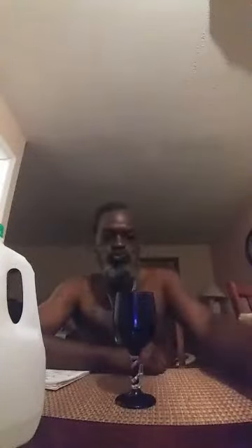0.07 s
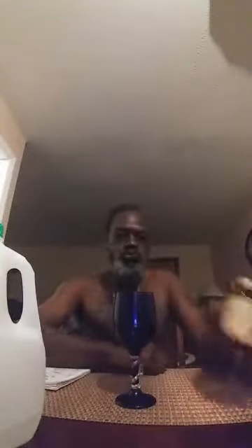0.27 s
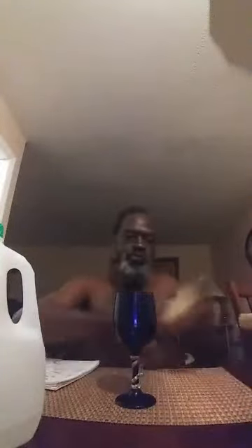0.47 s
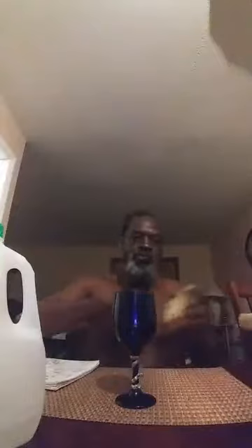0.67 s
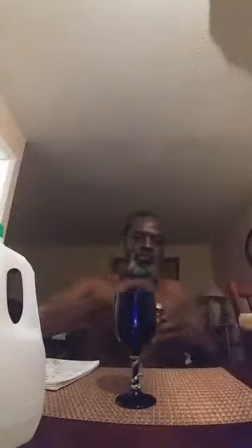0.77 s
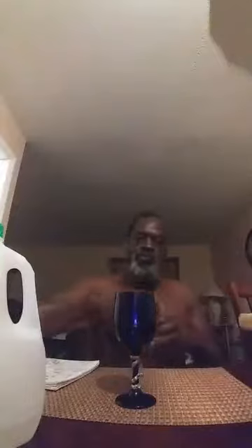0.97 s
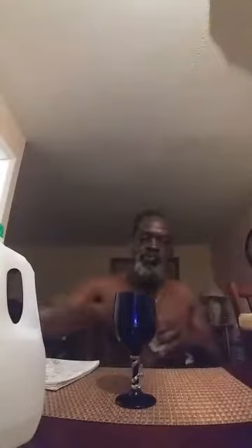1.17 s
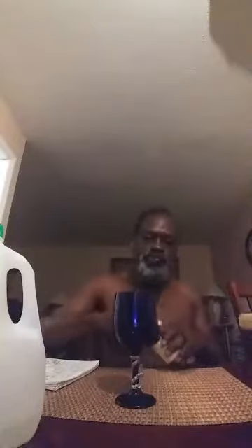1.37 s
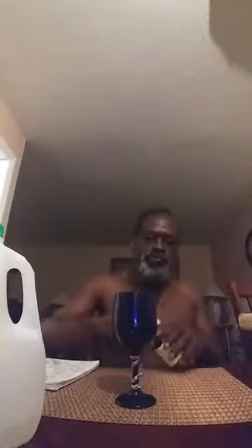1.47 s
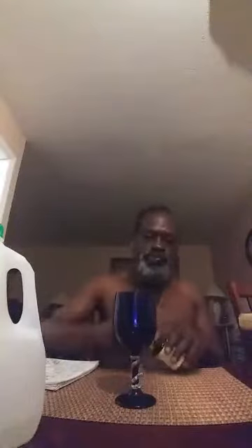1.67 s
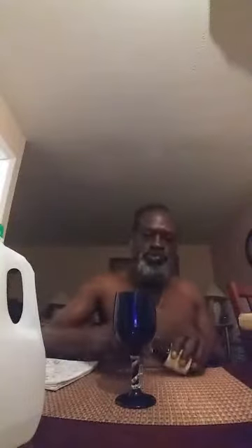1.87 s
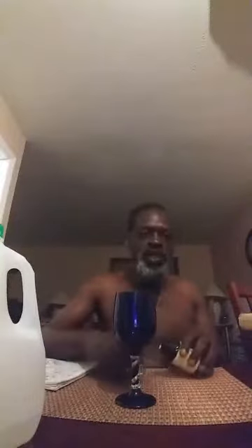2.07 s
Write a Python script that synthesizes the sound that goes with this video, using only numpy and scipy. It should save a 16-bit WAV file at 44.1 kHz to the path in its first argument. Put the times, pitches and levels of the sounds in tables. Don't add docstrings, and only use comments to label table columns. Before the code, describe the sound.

A small hard bottle of tablets is handled close to the microphone. A soft finger touch comes near 0.1 s, then bright rattling bursts at 0.45-0.6 and 0.67-0.8 s. The cap clicks at 1.0-1.1 s and rubs until 1.4 s, strongest near 1.3. A sharp rattle at 1.5-1.65 s precedes a table knock at 1.75 s. Faint brushing, short room echo, low hiss and hum.

```python
import sys
import numpy as np
from scipy import signal
from scipy.io import wavfile

SR = 44100
rng = np.random.default_rng(int(sys.argv[2]) if len(sys.argv) > 2 else 0)


def digitize_waveform(pressure):
    field = np.atleast_2d(pressure).T
    bounded = np.clip(field, -1, 1)
    quanta = np.round(bounded * 32767).astype(np.int16)
    wavfile.write(sys.argv[1], SR, quanta)


def to_linear_factor(level_db):
    exponent = np.asarray(level_db, float) / 20
    return 10 ** exponent


N = 92918

# frequency in Hz, width in Hz, level in dB.
LIFT_MODES = [(1760, 780, -12), (1957, 170, -12), (3580, 620, -8.5), (6560, 81, -6.5), (7070, 130, -9.5),
              (7620, 140, -6), (9100, 490, -5.5), (10000, 440, -6), (11580, 150, -0.5)]
# frequency in Hz, width in Hz, level in dB.
TIP_MODES = [(1850, 134, -8.5), (2000, 92, -9), (3610, 270, -15), (6400, 140, -28), (7900, 150, -6),
             (9100, 560, -2), (10000, 320, -12), (12000, 180, 0), (13300, 270, -16)]


def evened(x):
    return x / np.sqrt(np.mean(x ** 2) + 1e-20)


def read(points, hz):
    f, value = np.transpose(points)
    return np.interp(np.log(hz + 1), np.log(f + 1), value)


def curve(points, column=1):
    p = np.array(points)
    return to_linear_factor(np.interp(np.arange(N) / SR, p[:, 0], p[:, column], -140, -140))


def colour(x, points):
    gain = np.log(to_linear_factor(read(points, abs(np.fft.fftfreq(4096, 1 / SR)))))
    taps = np.fft.ifft(np.exp(np.conj(signal.hilbert(gain)))).real[:2048]
    return signal.oaconvolve(x, taps / np.linalg.norm(taps))[:N]


def resonate(x, hz, width):
    r = np.exp(-np.pi * max(width, 5) / SR)
    w = 2 * np.pi * hz / SR
    zeros = np.sqrt((1 - r * r) / 2) * np.array([1, 0, -1])
    return signal.lfilter(zeros, [1, -2 * r * np.cos(w), r * r], x)


def grit(per_s, spread_db):
    size = to_linear_factor(spread_db * np.minimum(rng.exponential(1, N), 4)) * rng.choice([-1., 1.], N)
    return evened(size * (rng.random(N) < per_s / SR))


def air():
    # frequency in Hz, level in dB per Hz.
    hiss = [(15, -60), (25, -18.5), (199, -3), (661, -12.5), (910, -24.5), (1160, -19), (1360, -27),
            (13400, -32), (14500, -67)]
    # frequency in Hz, width in Hz, level in dB.
    partials = [(66, 22, -53), (121, 12, -52), (223, 9, -49.5), (450, 18, -56)]
    hum = sum(to_linear_factor(db) * resonate(rng.standard_normal(N), hz, w) / np.sqrt(2) for hz, w, db in partials)
    return to_linear_factor(-51) * colour(rng.standard_normal(N), hiss) + hum


def room(x):
    # frequency in Hz, T60 in seconds.
    decay = [(250, 0.62), (660, 0.28), (1740, 0.22), (4590, 0.19), (12100, 0.15)]
    gap_s, late_db, late_slower = 0.0037, -24.5, 6.1
    taps = np.zeros(SR)
    at = np.arange(round(gap_s * SR), len(taps) - 10, 10)
    taps[at + rng.integers(0, 10, len(at))] = rng.choice([-1., 1.], len(at))
    hz, t, z = signal.stft(taps, SR, nperseg=128)
    fall_db = -60 * t / read(decay, hz)[:, None]
    fall = to_linear_factor(fall_db) + to_linear_factor(late_db + fall_db / late_slower)
    tail = signal.istft(z * fall, SR, nperseg=128)[1]
    return signal.oaconvolve(x, tail / np.linalg.norm(tail))[:N]


def rustle():
    # time in seconds, level in dB.
    strokes = [(0, -64), (.06, -50), (.11, -66), (.16, -62.5), (.3, -57), (.44, -64)]
    # frequency in Hz, level in dB.
    dry_colour = [(1200, -35), (2500, -28), (6500, -2), (9700, 8), (14000, -16)]
    hz, width_hz, start_db, t60_s = 600, 700, -49, 0.8
    shuffle = resonate(rng.standard_normal(N), hz, width_hz)
    shuffle = evened(resonate(shuffle, hz, 2 * width_hz))
    fade = to_linear_factor(start_db - 60 * np.arange(N) / SR / t60_s)
    return colour(grit(7000, 1.1), dry_colour) * curve(strokes) * to_linear_factor(-5) + shuffle * fade


def wooden_table(push, modes, rise_s):
    t = np.arange(SR // 4) / SR
    ring = sum(to_linear_factor(db - 60 * t / t60) * np.sin(2 * np.pi * hz * t) for hz, db, t60 in modes)
    return signal.oaconvolve(push, ring * np.minimum(t / rise_s, 1))[:N]


def wall(drive, hollow, modes, crack_db):
    # frequency in Hz, level in dB per Hz.
    crack = [(300, -9), (900, -10), (2600, -12), (5000, -12), (6500, -9), (10000, -6.5), (14000, -7.5)]
    # frequency in Hz, level in dB per Hz.
    body = [(250, -27.5), (600, 6), (1500, 4), (2400, -12), (3200, -3.5), (5000, -19.5), (14000, -40)]
    hollow_below_hz, damped_hz = 4500, 130
    out = to_linear_factor(crack_db) * colour(drive, crack)[:len(drive)]
    out = out + to_linear_factor(-18) * colour(hollow, body)[:len(drive)]
    for hz, w, db in modes:
        if hz < hollow_below_hz:
            push, size = resonate(hollow, hz, 4 * w), np.std(hollow)
        else:
            push, size = drive, np.std(drive)
        out = out + to_linear_factor(db) * size * evened(resonate(push, hz, max(w, damped_hz)))
    return out


def ticks(events, modes, db, crack_db, skew):
    # frequency in Hz, level in dB, T60 in seconds.
    wood = [(232, -7, .05), (310, -3, .05), (420, -4, .05), (600, -4, .04), (850, -4, .035)]
    spot_detune, spot_db = 0.006, 2.5
    out, thud = np.zeros((2, N + 3000))
    t = np.arange(3000) / SR
    for s, peak_db, hollow_db, thud_db, ms in events:
        u = np.clip(t / (max(ms, 1) / 1000), 0, 1)
        burst = np.sin(np.pi * u ** skew) * rng.standard_normal(len(t))
        burst = to_linear_factor(peak_db + db) * burst / np.linalg.norm(burst)
        chance = rng.standard_normal((len(modes), 2))
        spot = [(hz * (1 + spot_detune * a), w, level + spot_db * b)
                for (hz, w, level), (a, b) in zip(modes, chance)]
        at = round(s * SR)
        out[at:at + len(t)] += wall(burst, to_linear_factor(hollow_db) * burst, spot, crack_db)
        thud[at] += to_linear_factor(peak_db + thud_db)
    return out[:N] + wooden_table(thud[:N], wood, 0.0018)


def finger_touches():
    # start in seconds, peak in dB, hollow push in dB, thud in dB, contact in ms.
    touches = [
        (.0628, -24.5, 1.5, -45, 6.7),
        (.0894, -50, -3, -35, 4.4),
        (2.0974, -43.5, 11, -33, 23),
    ]
    # frequency in Hz, width in Hz, level in dB.
    modes = [(3980, 2000, 2), (5330, 4400, -6), (9700, 2600, 9)]
    return ticks(touches, modes, db=1.0, crack_db=1.5, skew=0.18)


def chatter():
    # time in seconds, level in dB.
    lifting = [(.449, -44), (.47, -37.5), (.52, -50.5), (.575, -37.5), (.655, -124), (.665, -36),
               (.69, -37.5), (.75, -51), (.8, -45.5)]
    # time in seconds, level in dB.
    tipping = [(1.503, -69), (1.512, -37), (1.545, -45), (1.56, -50), (1.59, -41), (1.62, -87), (1.66, -66)]
    scuffs = signal.oaconvolve(grit(900, 2.2), np.hanning(90))[:N]
    g = evened(scuffs * rng.standard_normal(N))
    a, b = g * curve(lifting), g * curve(tipping)
    lifted = wall(a, a * to_linear_factor(-9.0), LIFT_MODES, crack_db=6.5)
    return lifted + wall(b, b * to_linear_factor(7.0), TIP_MODES, crack_db=7.0)


def cap_rub():
    # time in seconds, level in dB, hollow push in dB.
    stroke = [
        (1.12, -44, -32),
        (1.17, -54, 24.5),
        (1.2, -42.5, 11.5),
        (1.26, -39.5, 13),
        (1.275, -34, 8.5),
        (1.303, -26, 4.5),
        (1.33, -41.5, 14.5),
        (1.37, -48, 0),
        (1.41, -81, -21),
    ]
    # frequency in Hz, width in Hz, level in dB.
    modes = [(1230, 260, -16), (1626, 286, -7.5), (2030, 370, -13.5), (4500, 1300, -5), (8320, 390, -5),
             (9070, 250, -4), (12050, 250, -14)]
    g = grit(5000, 2.2) * curve(stroke) * to_linear_factor(-10.5)
    return wall(g, g * curve(stroke, column=2), modes, crack_db=5.5)


def cap_clicks():
    # start in seconds, peak in dB, hollow push in dB, thud in dB, contact in ms.
    clicks = [
        (1.0095, -19.5, -3.5, -34, 10.6),
        (1.0945, -16.5, 3.5, -30, 6.7),
        (1.1114, -25, -27, -16.5, 9.9),
    ]
    # frequency in Hz, width in Hz, level in dB.
    modes = [(1250, 450, -13), (2100, 400, -13), (3640, 280, -9), (4550, 1300, -10.5), (6400, 500, -11.5),
             (7700, 240, -5.5), (8320, 460, 2.5), (9160, 500, -5), (12100, 270, -2.5), (12700, 470, -11)]
    return ticks(clicks, modes, db=4.5, crack_db=0.0, skew=0.61)


def set_down():
    # start in seconds, peak in dB, hollow push in dB, thud in dB, contact in ms.
    landings = [
        (1.7492, -23.5, 17, -9, 5.8),
        (1.7862, -12, 2, -51, 1.4),
        (1.7872, -16.5, 13, -23, 3),
        (1.7956, -26, 19, -38, 4.6),
    ]
    # frequency in Hz, width in Hz, level in dB.
    modes = [(1940, 200, -18), (6800, 700, -9), (8500, 700, -8), (10000, 400, -4), (11200, 600, -9),
             (12900, 500, -7)]
    return ticks(landings, modes, db=2.5, crack_db=2.5, skew=0.94)


def base_knock():
    # frequency in Hz, level in dB, T60 in seconds.
    modes = [(452, -23, .09), (340, -31, .07), (641, -31, .07), (1150, -38, .03)]
    landing = 1. * (np.arange(N) == round(1.7465 * SR))
    return wooden_table(landing, modes, 0.0038)


def lift_tumble():
    # start in seconds, peak in dB, hollow push in dB, thud in dB, contact in ms.
    tumble = [(.4476, -18, 7.5, -20.5, 4.8), (.455, -25.5, 19, -40, 4.5), (.4605, -18.5, 5, -18, 8.1),
              (.465, -17.5, 9.5, -20, 3.1), (.4752, -27, 12, -10, 3.8), (.4933, -25.5, 13, -8, 7),
              (.5305, -21, 8.5, -10.5, 17), (.5532, -21.5, -3, -21, 6.4), (.5562, -15, -23, -39, 5.2),
              (.5617, -15, 2.5, -28, 5.8), (.5755, -22, -5, -34, 1.4), (.585, -32, -14, -24, 6.4),
              (.661, -51, -11, -28, 9.2), (.667, -17, 9, -18.5, 3.9), (.674, -23.5, 10, -19, 2.6),
              (.6769, -21, -8, -27, 2.5), (.6848, -11.5, 6, -30.5, 4.5), (.6921, -18.5, -14, -10.5, 4),
              (.699, -15, 5.5, -43, 12), (.7068, -34, -11, -38, 4.6), (.7185, -29, 12, -37, 8.3),
              (.761, -26, 6, -30, 3.1), (.7683, -13, -12, -43, 5.2), (.7753, -32, 2, -35, 4.5),
              (.7853, -18, -6, -40, 6.5), (.791, -21, 2, -30, 5.4)]
    return ticks(tumble, LIFT_MODES, db=6.5, crack_db=1.0, skew=0.38)


def tip_tumble():
    # start in seconds, peak in dB, hollow push in dB, thud in dB, contact in ms.
    tumble = [(1.5022, -9, -12, -39, 5), (1.507, -22, -12, -36, 6.8), (1.5125, -20, 0, -18, 3.4),
              (1.516, -13, -3, -21.5, 7.3), (1.523, -16.5, -3, -23, 4.8), (1.532, -9.5, 5, -24, 6),
              (1.539, -15, 0, -30, 5.4), (1.547, -28.5, -5, -27, 8), (1.5685, -20, -15, -16, 4.5),
              (1.5725, -19.5, 6, -17, 5.6), (1.5775, -18.5, 7, -25, 3.4), (1.586, -22, 5, -18, 3.3),
              (1.592, -33, 8, -6, 4.8), (1.628, -23.5, 8.5, -34, 12), (1.6318, -8.5, -3, -37, 7.8),
              (1.643, -26, 7, -11.5, 6.9)]
    return ticks(tumble, TIP_MODES, db=5.5, crack_db=2.0, skew=0.42)


def pings():
    # start in seconds, peak in dB, frequency in Hz, ring in ms.
    landings = [(.026, -40, 10000, 4.2), (.027, -49, 7700, 4), (.063, -35, 3830, 1.5), (.366, -51, 7800, 4),
                (1.094, -26.5, 2040, 3.8), (.455, -28, 2000, 2.2), (1.2985, -25.5, 8570, 6),
                (.4482, -21.5, 9100, 3), (.463, -18.5, 11900, 4), (.5565, -20, 12100, 5.6),
                (.5625, -20.5, 11750, 5.1), (.562, -26, 3570, 2.4), (.5755, -22.5, 8000, 2.5),
                (.5755, -23, 9900, 3.4), (.578, -22.5, 11800, 15), (.6775, -13.5, 11940, 7.2),
                (.683, -17.5, 6400, 7.1), (.6855, -15, 11920, 3.7), (.7068, -30, 10000, 5.9),
                (.718, -23, 10240, 5.9), (.769, -29, 6400, 12), (.775, -16.5, 11870, 3.8),
                (1.304, -35, 3620, 14), (1.356, -44.5, 3560, 12), (1.5025, -10.5, 11860, 4.7),
                (1.503, -26, 3610, 5.1), (1.518, -27.5, 3610, 12.5), (1.528, -22, 1850, 3.6),
                (1.533, -17.5, 12000, 9), (1.533, -30, 1970, 6), (1.542, -28, 1853, 4),
                (1.578, -32, 1958, 13), (1.634, -15.5, 9100, 4.2), (1.636, -21, 12000, 4.6),
                (1.7495, -25, 8500, 1.7), (1.012, -30, 12100, 5.5), (1.3, -32, 12050, 14),
                (1.31, -36, 2137, 30)]
    peak_at, partner, partner_db = 0.35, 1.02, -9
    out = np.zeros(N + 3000)
    t = np.arange(3000) / SR
    for s, peak_db, hz, ms in landings:
        phase = 2 * np.pi * rng.random(2)
        u = t / (peak_at * max(ms, 1) / 1000)
        pair = np.sin(2 * np.pi * hz * t + phase[0])
        pair += to_linear_factor(partner_db) * np.sin(2 * np.pi * hz * partner * t + phase[1])
        at = round(s * SR)
        out[at:at + len(t)] += to_linear_factor(peak_db - 1.5) * u * np.exp(1 - u) * pair
    return out[:N]


def scene():
    near = rustle() + finger_touches() + chatter() + cap_rub() + cap_clicks()
    near = near + set_down() + lift_tumble() + tip_tumble()
    aimed = base_knock() + pings()
    echo = to_linear_factor(-3) * room(near + to_linear_factor(-7) * aimed)
    return (near + aimed + echo + air())[None]


def low_pass(x):
    return signal.sosfilt(signal.butter(12, 15210, fs=SR, output="sos"), x)


def record(dry):
    treble_cut = signal.firwin(221, 13880, window=("kaiser", 2), fs=SR)
    cut = signal.oaconvolve(dry, treble_cut[None], "same")
    cut = signal.sosfilt(signal.butter(2, 40, "high", fs=SR, output="sos"), cut)
    return low_pass(cut)


dry = scene()
out = record(dry)
digitize_waveform(out)
```